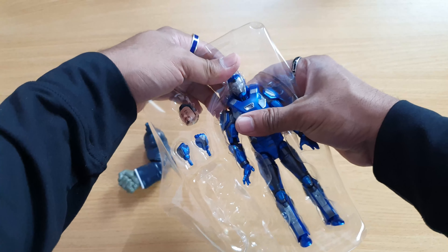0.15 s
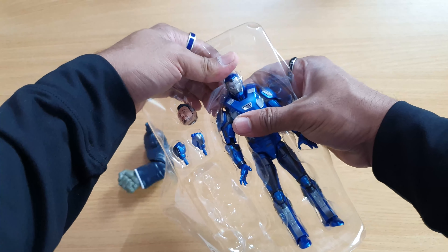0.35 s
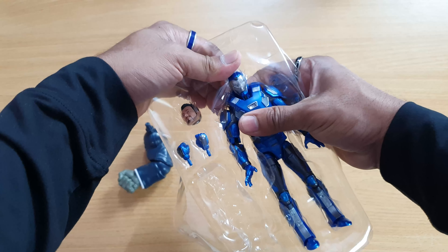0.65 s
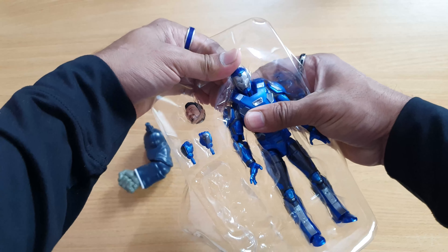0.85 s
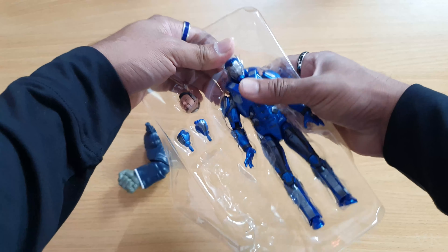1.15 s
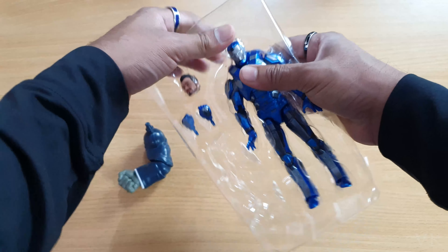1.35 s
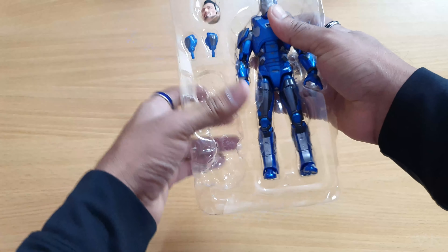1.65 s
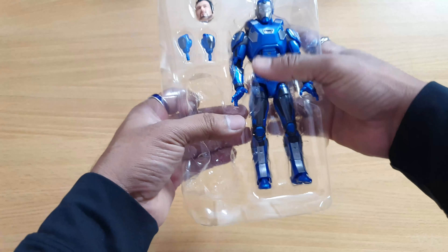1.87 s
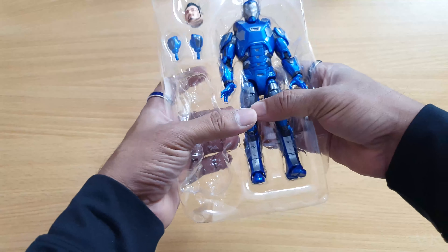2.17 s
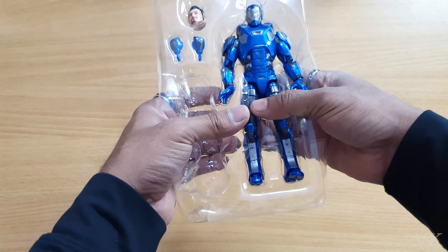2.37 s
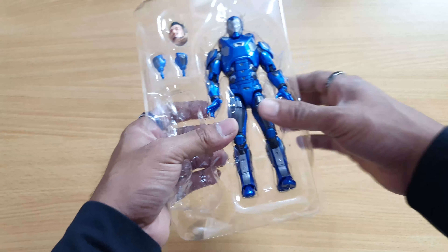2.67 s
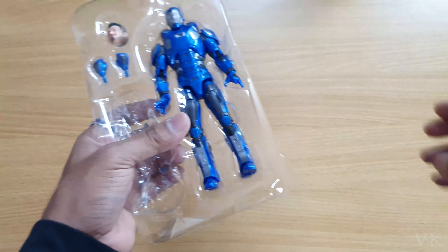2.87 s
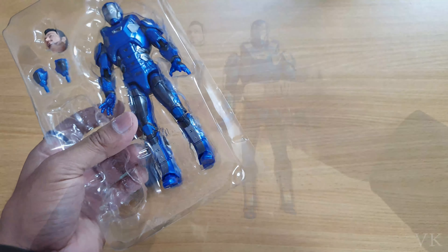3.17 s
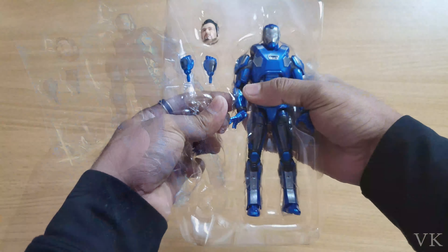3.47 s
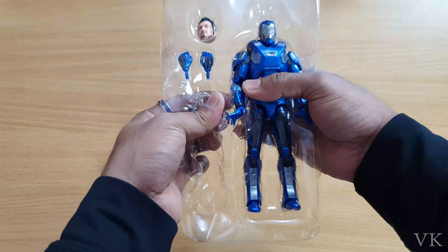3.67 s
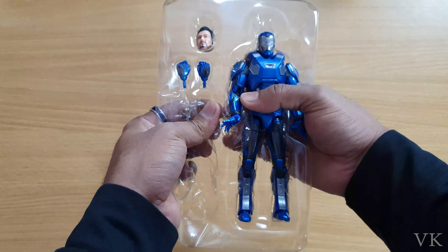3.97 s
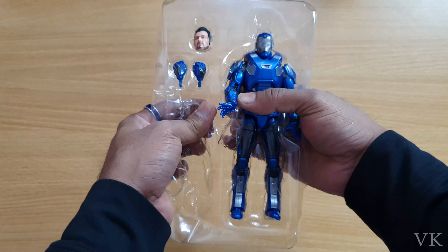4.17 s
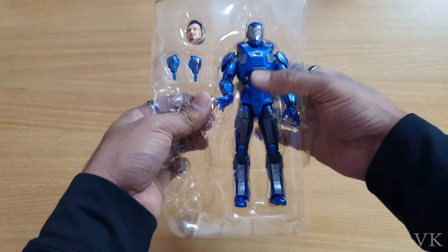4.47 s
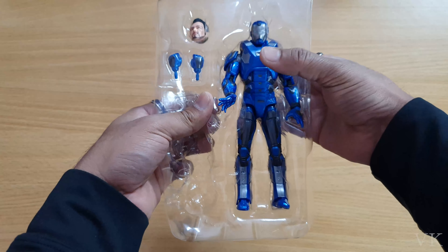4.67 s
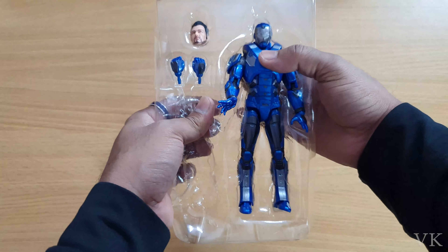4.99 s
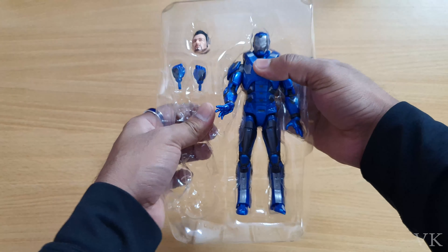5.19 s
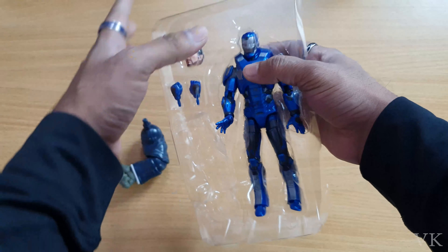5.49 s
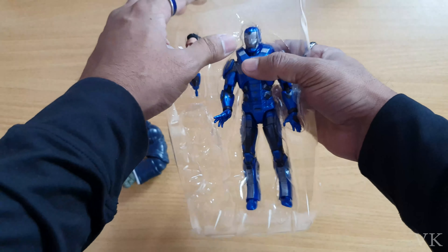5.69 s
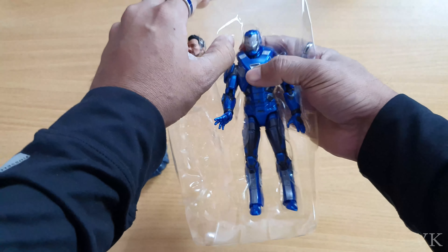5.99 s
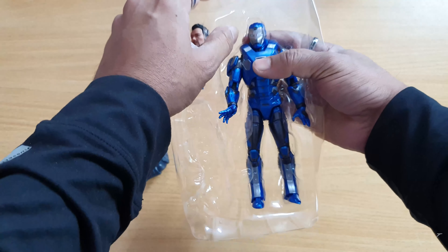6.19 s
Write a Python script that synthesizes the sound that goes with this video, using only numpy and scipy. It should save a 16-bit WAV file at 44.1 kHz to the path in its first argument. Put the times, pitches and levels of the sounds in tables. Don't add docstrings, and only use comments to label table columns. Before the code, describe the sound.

Stiff clear plastic packaging snaps, crackles and crunches loudly in gripping hands, pauses briefly, then is bent harder in a small bare room.

```python
import sys
import numpy as np
from scipy import signal
from scipy.fft import rfft, irfft
from scipy.io import wavfile

SR = 44100
rng = np.random.default_rng(int(sys.argv[2]) if len(sys.argv) > 2 else 0)


def voltage_ratio(decibels):
    exponent = np.asarray(decibels, float) / 20
    return 10 ** exponent


def transcribe(signal):
    frames = np.atleast_2d(signal).T
    limited = np.clip(frames, -1, 1)
    pcm = np.round(limited * 32767).astype(np.int16)
    wavfile.write(sys.argv[1], SR, pcm)


N = 279339


def rms_one(x):
    return x / np.sqrt(np.mean(x ** 2) + 1e-20)


def matched(x, like):
    return x * np.sqrt(np.sum(like ** 2) / np.sum(x ** 2))


def at_hz(points, hz, order=1):
    points = np.array(points)
    return np.interp(np.log(hz + 1), np.log(points[:, 0]), points[:, order])


def swell(t, t60, rise):
    shape = (1 - np.exp(-(t / rise) ** 2)) * voltage_ratio(-60 * t / t60)
    return shape / shape.max()


def ring(t, hz, t60, rise):
    return swell(t, t60, rise) * np.sin(2 * np.pi * hz * t)


def resonance(x, hz, width):
    r = np.exp(-np.pi * width / SR)
    return signal.lfilter([1, 0, -1], [1, -2 * r * np.cos(2 * np.pi * hz / SR), r * r], x)


def band(x, order, low_hz, high_hz):
    return signal.sosfilt(signal.butter(order, [low_hz, high_hz], "band", fs=SR, output="sos"), x)


def add(out, sound, start_s, lag, pan_db):
    for side, sign in enumerate((1, -1)):
        at = max(round(start_s * SR - sign * lag / 2), 0)
        out[side, at:at + len(sound)] += voltage_ratio(sign * pan_db / 2) * sound[:N - at]


def creases():
    # start_s, rib_db, panel_hz, panel_db, crack_db
    wide = [(0.0585, -3, 437, -8.5, -45), (0.0799, 1, 360, -16, -21), (0.4882, -2, 596, -10, -27.5),
            (0.7357, -5, 740, -12, -26), (0.907, -12.5, 648, -9.5, -24.5), (1.161, -7.5, 560, -11, -36),
            (1.1699, -11.5, 680, -12.5, -34), (1.3571, 3.5, 930, -9, -4), (1.4591, -13, 610, -15, -40),
            (1.596, -23, 566, -21, -57), (1.7987, -2.5, 560, -10.5, -31), (1.8151, -3, 590, -15, -30),
            (1.8377, -1.5, 697, -15, -30), (1.943, -2.5, 616, -15, -36.5), (1.967, -8.5, 993, -24, -31.5),
            (2.0033, -0.5, 650, -27, -16.5), (2.0385, -5, 754, -12, -24.5), (2.0777, -1, 535, -8, -35),
            (2.145, 1, 313, -23.5, -24), (2.3212, -6.5, 600, -16, -32), (2.4076, -9, 1070, -14.5, -28.5),
            (2.156, -3, 595, -16, -18),
            (3.5564, -5.5, 670, -3, -31.5), (3.7446, -2, 695, -25.5, -8.5),
                  (3.7562, -6, 880, -23.5, -7), (3.9263, -0.5, 970, -26, -21.5),
                  (3.9677, -4.5, 655, -6.5, 0), (4.0632, 0.5, 652, -2.5, -15), (4.2668, 1, 751, -14, -11),
                  (4.3664, 0.5, 782, -9, -29), (4.7002, -1.5, 659, -14, -21), (4.9281, 4.5, 680, -3, -6.5),
                  (4.9583, -12, 554, -15, -34.5), (5.0399, -5.5, 771, -18, -8),
                  (5.1296, 3, 529, -11.5, -17.5), (5.1898, -1, 910, -26, -10), (5.22, 2.5, 743, -4, -1),
                  (5.6479, -13, 550, -27, -38.5), (5.78, -30.5, 377, -41, -41),
                  (5.8191, -13, 783, -35, -32), (5.8378, -11.5, 770, -19, -25),
                  (5.8768, 2.5, 662, -9.5, -21), (5.9207, -16, 533, -14, -28), (5.9494, 3, 759, -12, -21.5),
                  (6.0067, 2.5, 755, -7.5, -26), (6.3149, -6, 764, -16, -24)]
    broad = [(0.0024, -1.5, 861, -12.5, -15), (0.0700, -4.5, 923, -4.5, -30),
             (0.1365, -9.5, 999, -17.5, -40.5), (0.1642, -16, 999, -30, -8.5),
             (0.4488, 2.5, 767, -4.5, -11), (0.4747, 2.5, 683, -0.5, -6), (0.7731, -13.5, 391.4, -8.5, -35),
             (1.6399, -15.5, 534, -6, -42), (2.6823, -14, 730, -27.5, -34), (2.5255, -7.5, 770, -29, -32.5),
             (3.597, 3.5, 777, -2.5, -5.5), (3.8465, -4, 974, -56.5, -12),
             (4.1362, -1.5, 667, -39.5, -26.5), (4.504, -10, 657, -34.5, -10.5),
             (4.5868, -2, 808, -20.5, -6.5), (4.9014, -10, 767, -11, -18.5), (4.9374, -7, 693, -5.5, -10),
             (5.1746, -3.5, 953, -32.5, -15.5), (5.2997, -7.5, 507, -18, -25),
             (5.4857, -42, 444, -45, -32.5), (5.5999, -19.5, 684, -35.5, -31),
             (5.6333, -10, 554, -29.5, -39)]
    slim = [(0.3848, 0.5, 840, -18.5, -26), (0.5962, 2.5, 413, -17, -33), (0.6438, -22.5, 431, -36.5, -16),
            (1.861, -2, 656, -12, -26.5), (1.8802, 1, 755, -14, -38.5), (2.1092, 1.5, 784, -11.5, -24.5),
            (2.3094, -18, 580, -32, -27), (3.7942, 0, 830, -24, -5), (4.1694, -3, 980, -38, -8),
            (4.624, -0.5, 855, -30.5, -21.5), (4.9848, -1, 458, -14, -26), (5.2419, 1.5, 526, -5, -17.5),
            (5.8635, 5, 490, -14.5, -21.5), (6.2036, -2, 876, -20.5, -25), (6.2091, -1, 806, -11.5, -28.5),
            (6.2935, -7.5, 770, -24, -28.5)]
    narrow = [(0.2096, 0.5, 980, -26, -11), (0.2301, 0.5, 603, -40, -23.5),
              (0.2568, -16.5, 557, -13.5, -38.5), (0.3118, -4.5, 522, -35, -20.5),
              (0.3205, -6.5, 751, -18, 7.5), (0.3323, -4, 929, -7.5, -8), (0.6752, -1.5, 735, -18, -15.5),
              (0.815, 1, 770, -14, -20.5), (1.0597, -17, 711, -40, -29), (1.07, -15, 991, -42, -35),
              (1.139, -16, 417, -38.5, -27.5), (1.2604, -35.5, 581, -46, -45.5),
              (1.2913, -33, 509, -35, -49.5), (1.6717, -14, 522, -23.5, -28.5), (1.731, -24, 519, -34, -50),
              (1.7836, -12.5, 498, -20.5, -35.5), (2.0287, -10, 778, -17.5, -23),
              (2.2025, -3, 528, -28.5, -7.5), (2.4225, -17, 999, -35, -20.5),
              (2.471, -18.5, 377, -46.5, -31.5), (2.54, -10, 670, -29, -13), (2.6193, 1.5, 544, -9.5, -14),
              (2.7466, -42.5, 546, -45, -52),
              (3.3711, -16, 810, -32, -14), (3.38, -6, 797, -30, -20.5),
                    (3.4815, -1.5, 709, -2.5, -9), (3.4904, -14, 648, -9.5, -32),
                    (3.5061, -1.5, 678, -21, 5), (3.515, 0.5, 650, -12.5, -7.5),
                    (3.7141, -14, 691, -24, -21.5), (3.8817, -5.5, 849, -25.5, -16.5),
                    (4.0154, 0.5, 775, -22.5, -12), (4.0364, 6, 793, -19.5, -2),
                    (4.2177, -9, 756, -43, -21), (4.2378, -5.5, 684, -37.5, -11.5),
                    (4.359, 1, 579, -11, -5), (4.834, -28, 360, -43, -17), (5.2565, -2, 510, -19, -10),
                    (5.9853, -2, 762, -11, -26.5), (6.0838, -8.5, 766, -4, -30.5),
                    (6.2672, -2, 794, -13, -12)]
    # start_s, rib_db, rib_hz, panel_db, crack_db
    slips = [(0.9603, -24.5, 3720, -40.5, -20), (0.9656, -18.5, 2540, -29.5, -11.5),
             (0.9751, -16, 3920, -23.5, -30.5), (0.9824, -22, 2800, -27.5, -32.5),
             (0.9921, -13.5, 2650, -28, -29.5), (1.0004, -21, 1000, -33, -36),
             (1.0074, -20, 1100, -40.5, -38), (1.0144, -21.5, 1640, -29.5, -38),
             (1.0255, -21, 1110, -31.5, -40), (1.0376, -22.5, 2790, -37.5, -40),
             (1.051, -15, 1160, -32.5, -32), (1.0762, -11.5, 3060, -40, -30.5),
             (1.1334, -20, 3210, -35.5, -30), (1.1457, -8, 1400, -22.5, -31.5),
             (1.2768, -25, 1820, -35.5, -56), (2.9223, -33.5, 1220, -39.5, -43.5)]
    slips_later = [(3.4092, -20.5, 1780, -28, -44.5), (3.4177, -23, 1290, -28.5, -31),
                   (3.4306, -29.5, 1220, -29.5, -35.5), (3.4391, -15.5, 1270, -25, -23),
                   (3.9765, 4, 3080, -24.5, -15.5), (3.9963, -2, 3020, -24.5, -13),
                   (4.0053, 1, 3000, -10, -12.5), (4.0256, -2.5, 2900, -21.5, -11),
                   (4.0311, 1.5, 2637, -15, -9.5), (4.0394, -2, 2990, -5, -16.5),
                   (4.2844, -4, 1410, -14, -23), (4.2899, -2.5, 2760, -16.5, -25.5),
                   (4.2994, -1.5, 2710, -16, -6.5), (4.3035, 2.5, 2700, -14.5, -14.5),
                   (4.3154, -4, 1250, -16.5, -8), (4.34, -4, 1380, -13, -13),
                   (5.3602, -7.5, 3265, -17, -27.5), (5.3662, -9, 1258, -15, -27.5),
                   (5.3749, -13.5, 1170, -20.5, -32), (5.3855, -9.5, 1463, -17.5, -34),
                   (6.088, -1, 2796, -10.5, -25), (6.114, -2, 2690, -19, -23),
                   (6.1315, -4.5, 2800, -15.5, -26), (6.1454, -2, 2750, -16, -28),
                   (6.1681, -4.5, 2710, -14, -25), (6.2202, -15, 2570, -24.5, -34),
                   (6.251, -12.5, 2650, -23.5, -22)]
    # start_s, panel_hz, panel_db
    pops = [(.321, 373, -15), (0.971, 344, -20), (1.146, 435, -28), (1.318, 435, -22.5),
            (1.328, 550, -10.5), (1.359, 316, -20), (3.564, 257, -22.5), (3.61, 437, -10),
            (4.357, 527, -11), (5.376, 272, -19), (5.667, 322, -30), (6.084, 450, -11), (6.131, 426, -24),
            (6.292, 340, -24)]
    # start_s, rib_db, crack_db
    ticks = [(.428, -15, -35), (1.352, -6.5, -29.5), (2.399, -33, -29), (2.412, -10.5, -35.5),
             (3.385, -16.5, -13.5), (3.461, -12.5, -28.5), (3.466, -6, -6), (3.783, -20, -12.5),
             (3.865, -14.5, -22.5), (3.906, -14.5, -28.5), (4.441, -25, -31.5), (4.488, -22.5, -35.5),
             (4.861, -14, -23.5), (5.121, -5.5, -30), (5.591, -31.5, -35.5), (5.792, -36, -40.5),
             (5.825, -26, -24.5), (5.967, -4.5, -31), (6.304, -7, -24.5)]
    ribs_hz = [1335.4, 1794, 2480, 2920]
    slip_panel_hz, slip_stray, rib_stray = 684, 0.15, 0.022
    panel_boost_db, crack_boost_db = 1.5, 6.5

    # start_s, panel_hz, panel_db, rib_hz, rib_db, crack_db
    rows = []
    for rib_hz, table in zip(ribs_hz, (wide, broad, slim, narrow)):
        for start_s, rib_db, panel_hz, panel_db, crack_db in table:
            rows.append((start_s, panel_hz, panel_db, rib_hz, rib_db, crack_db))
    for start_s, rib_db, rib_hz, panel_db, crack_db in slips + slips_later:
        panel_hz = slip_panel_hz * np.exp(slip_stray * rng.standard_normal())
        rows.append((start_s, panel_hz, panel_db, rib_hz, rib_db, crack_db))
    for start_s, panel_hz, panel_db in pops:
        rows.append((start_s, panel_hz, panel_db, ribs_hz[0], panel_db - 6.5, panel_db - 30.5))
    for start_s, rib_db, crack_db in ticks:
        rows.append((start_s, slip_panel_hz, rib_db - 11.5, ribs_hz[3], rib_db, crack_db))
    rows = np.array(rows) + [0, 0, panel_boost_db, 0, 0, crack_boost_db]
    rows[:, 3] *= np.exp(rib_stray * rng.standard_normal(len(rows)))
    return rows


def snaps(panel_t60, rib_t60, crack_t60, rib_q, tone_db):
    desk_s, desk_db = 0.0009, -7
    near, far = np.zeros((2, N)), np.zeros((2, N))
    t = np.arange(2400) / SR
    click = 1. * (np.arange(len(t)) == 12)
    rows = creases()
    luck = rng.standard_normal((len(rows), 6))
    roughness = voltage_ratio(4.17 * rng.standard_normal((len(rows), len(t))))
    tear = rng.standard_normal((len(rows), len(t))) * roughness
    broad = rms_one(band(tear, 3, 950, 3900))
    deep = band(tear, 2, 280, 950)
    bright = signal.lfilter([1], [1, -.55], band(tear, 2, 3400, 13500))
    tick = signal.lfilter([1], [1, -.55], band(click, 2, 3400, 13500))
    thud = band(click, 2, 330, 900)
    spike = band(click, 2, 900, 7000)
    spike = spike / np.abs(spike).max()

    for k, (start_s, panel_hz, panel_db, rib_hz, rib_db, crack_db) in enumerate(rows):
        z = luck[k]
        over_db = 0.92 * max(max(panel_db, rib_db) + 2.5, 0)
        longer = 1 + 0.93 * np.clip(voltage_ratio(panel_db), 0, 1)
        softer = 1 + 1.6 * np.clip(voltage_ratio(panel_db - rib_db), 0, 6)

        panel = ring(t, panel_hz, panel_t60, 0.0017 * softer)
        flap = deep[k] * swell(t, 2.7 * panel_t60, 0.0027)
        panel += voltage_ratio(-6.0) / softer * flap / np.abs(flap).max()
        panel = voltage_ratio(over_db + panel_db - 3.0) * panel

        rib = broad[k] + voltage_ratio(-1.5) * rms_one(resonance(tear[k], rib_hz, rib_hz / rib_q))
        rib = rib * swell(t, rib_t60 * longer, .001)
        rib = rib / np.abs(rib).max()
        rib = rib + voltage_ratio(tone_db) * ring(t, rib_hz, rib_t60 * longer, 0.00053)
        rib = voltage_ratio(over_db + rib_db - 3.0) * (rib + voltage_ratio(-14.5) * spike)

        crack = bright[k] * swell(t, crack_t60 * longer, .001)
        crack += 0.78 * matched(np.roll(tick, 16), crack)
        crack = voltage_ratio(over_db + crack_db) * crack / np.abs(crack).max()

        blur = resonance(resonance(click, rib_hz, 0.63 * rib_hz), 2000, 3000)
        away = 0.67 * panel + 0.6 * matched(thud, panel)
        away = away + 0.6 * rib + matched(blur, rib) + matched(tick, crack)
        add(far, away, start_s, lag=0, pan_db=-1)

        add(near, panel + rib + crack, start_s, lag=3.5 + 1.5 * z[2], pan_db=-1.3 + 1.8 * z[3])
        bounce_s = desk_s * np.exp(0.3 * z[1])
        add(near, voltage_ratio(desk_db) * (rib + crack), start_s + bounce_s, lag=8.0 * z[4], pan_db=4.9 * z[5])
    return near, far


def creak():
    start_s, gap_s, level_db, fade_db = 4.8698, .0071, -6.5, -0.5
    pitch_hz, t60_s = 1900, .005
    out, t = np.zeros((2, N)), np.arange(600) / SR
    for k, z in enumerate(rng.standard_normal((8, 2))):
        pulse = ring(t, pitch_hz, t60_s, 0.00012)
        pulse += voltage_ratio(-14.0) * ring(t, 0.22 * pitch_hz, 3.0 * t60_s, .0005)
        pulse *= voltage_ratio(level_db - fade_db * k + 1.5 * z[0])
        add(out, pulse, start_s + gap_s * k + .0001 * z[1], lag=4, pan_db=6.0)
    return out


def crackle(strain, per_s, spread_db, level_db, settle_s):
    # pitch_hz, width_hz, level_db
    sheet = [(610, 200, -0.5), (1370, 180, 6), (2880, 730, 12.5), (4630, 870, 5.5), (9050, 3770, -27)]
    creep_s, creep_db = 0.0017, -3
    r = np.exp(-1 / (settle_s * SR))
    unrest = np.sqrt(signal.lfilter([1 - r], [1, -r], strain ** 2))
    r = np.exp(-1 / (creep_s * SR))
    before = signal.lfilter([1 - r], [1, -r], strain[::-1] ** 2)[::-1]
    unrest += voltage_ratio(creep_db) * np.sqrt(before)

    size_db = np.clip(spread_db, 0, 5) * np.minimum(rng.exponential(1, N), 3)
    sizes = voltage_ratio(size_db) * rng.standard_normal(N)
    slips = sizes * (rng.random(N) < per_s / SR) + 1e-18
    dealt, out = rng.random((len(sheet), N)), np.zeros(N)
    for (pitch_hz, width_hz, db), share in zip(sheet, dealt):
        out += voltage_ratio(db) * rms_one(resonance(slips * share ** 2, pitch_hz, width_hz))
    both = np.zeros((2, N))
    add(both, rms_one(out) * unrest * voltage_ratio(level_db), 0, lag=4, pan_db=-6.5)
    return both


def room(x, gap_s, alike):
    # pitch_hz, t60_s, level_db
    walls = [(212, 0.27, -32), (550, 0.14, -16.5), (1510, 0.31, -20.5), (3340, 0.31, -28.5),
             (5300, 0.27, -26), (8900, 0.37, -29.5), (15500, .18, -28)]
    t, echo = np.arange(SR // 2) / SR, 0
    for low_hz in 150 * 2. ** np.arange(0, 7, .5):
        high_hz = min(low_hz * np.sqrt(2), .45 * SR)
        mid, side = band(rng.standard_normal((2, len(t))), 2, low_hz, high_hz)
        apart = np.clip(alike * low_hz / 1000, 0, 1)
        fall = voltage_ratio(at_hz(walls, 1.224 * low_hz, order=2) - 60 * t / at_hz(walls, 0.74 * low_hz))
        echo = echo + fall * (mid + apart * side * [[1], [-1]]) / np.sqrt(1 + apart ** 2)
    echo = echo * (1 - np.exp(-(t / gap_s) ** 2)) * voltage_ratio(-9.0)
    return signal.fftconvolve(x[:1], echo, axes=1)[:, :N]


def room_tone():
    # pitch_hz, level_db (per Hz)
    hum = [(18, -36.5), (55, -21), (80, 2), (170, -2.5), (230, 3), (1200, -6), (12000, -48), (15600, -105)]
    # pitch_hz, likeness (-1 to 1)
    likeness = [(60, 0.37), (240, 1), (950, -1), (3770, 0.49), (15000, -0.0042)]
    hum_db, murmur_hz, murmur_width_hz, murmur_db = -49.5, 1170, 160, -63
    hz = np.arange(N // 2 + 1) * SR / N
    alike = np.clip(at_hz(likeness, hz), -1, 1)
    mid, side = rfft(rng.standard_normal((2, N))) * voltage_ratio(at_hz(hum, hz))
    pair = np.sqrt(1 + alike) * mid + np.sqrt(1 - alike) * side * [[1], [-1]]
    murmur = rms_one(resonance(rng.standard_normal((2, N)), murmur_hz, murmur_width_hz))
    return voltage_ratio(hum_db) * rms_one(irfft(pair, N)) + voltage_ratio(murmur_db) * murmur


def scene():
    near, far = snaps(panel_t60=0.02, rib_t60=0.017, crack_t60=0.0017, rib_q=1.85, tone_db=-6.0)
    tray = near + creak()
    strain = np.gradient(tray[0])
    tray += crackle(strain, per_s=700, spread_db=4.0, level_db=-5, settle_s=0.012)
    far += tray - near
    turn = np.arange(N) * 16 // N
    echoes = sum(room(far * (turn == k), gap_s=.008, alike=0.73) for k in range(16))
    return tray + echoes + room_tone()


def band_limit(x):
    return signal.sosfilt(signal.butter(12, 15900, fs=SR, output="sos"), x)


def record(dry):
    mix = np.clip(voltage_ratio(1.23) * dry, -.99, .99)
    return band_limit(mix)


dry = scene()
out = record(dry)
transcribe(out)
```